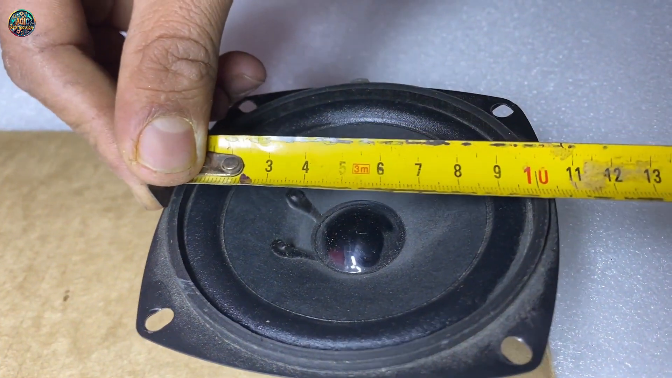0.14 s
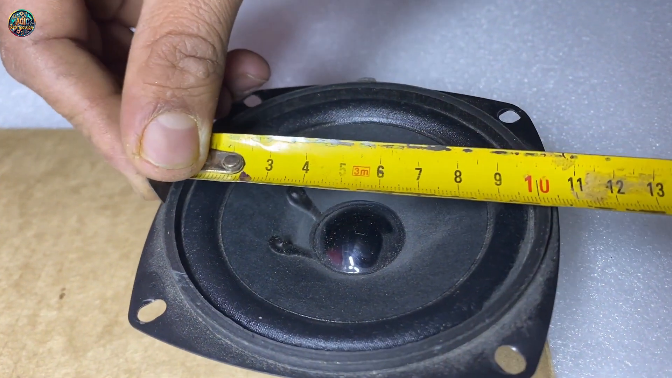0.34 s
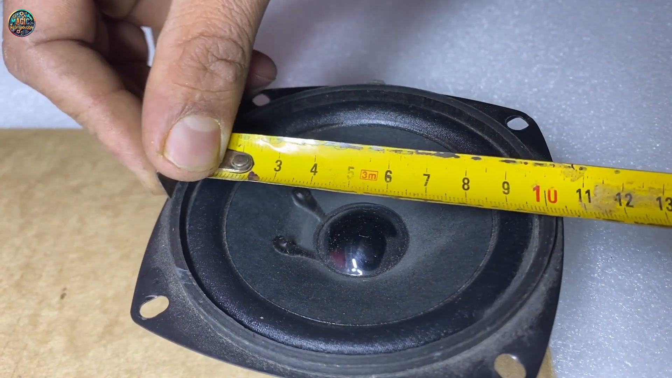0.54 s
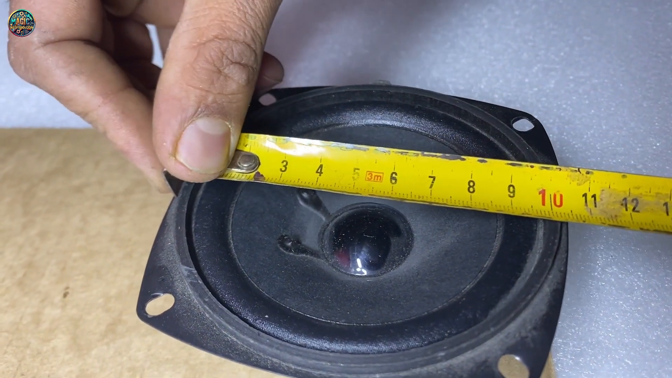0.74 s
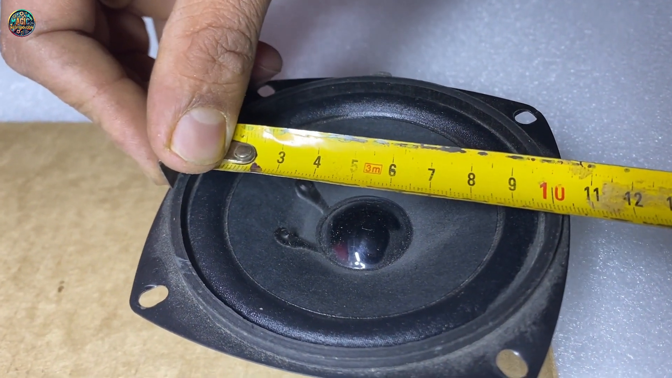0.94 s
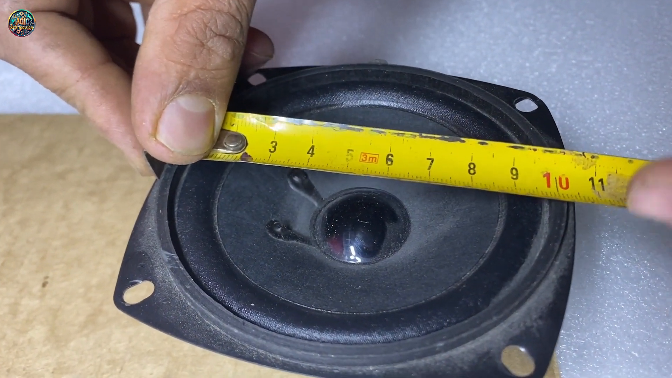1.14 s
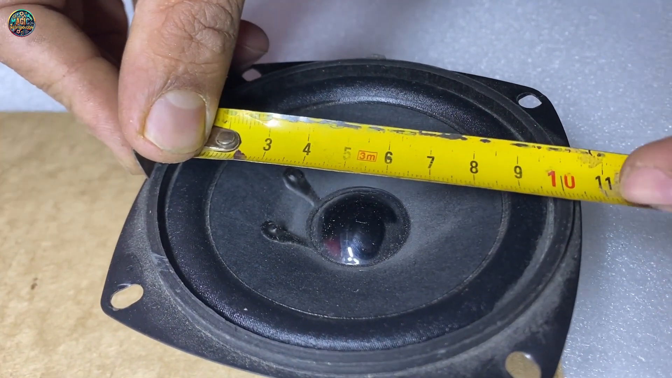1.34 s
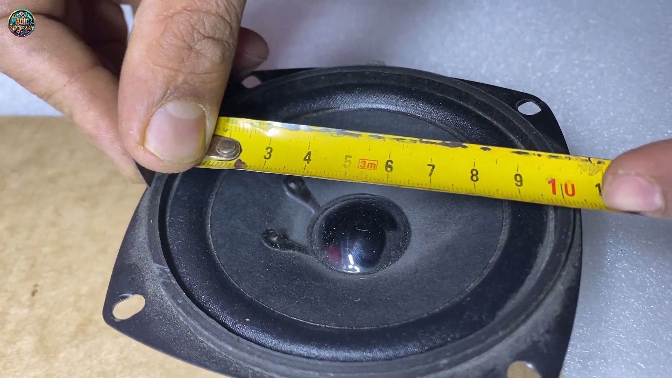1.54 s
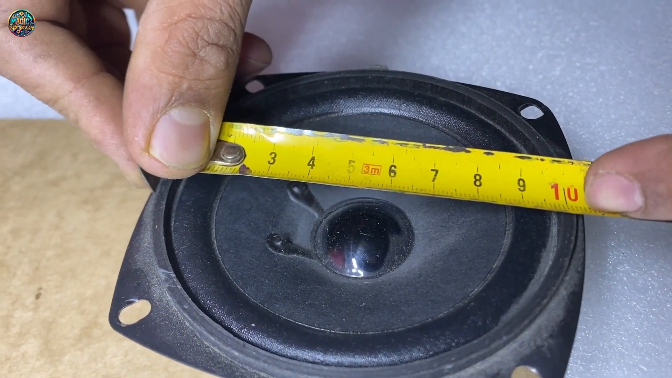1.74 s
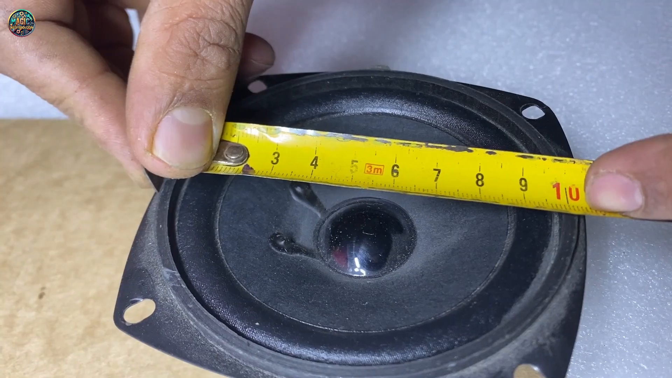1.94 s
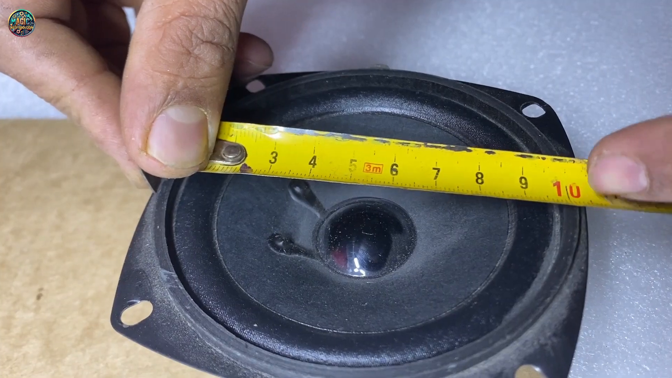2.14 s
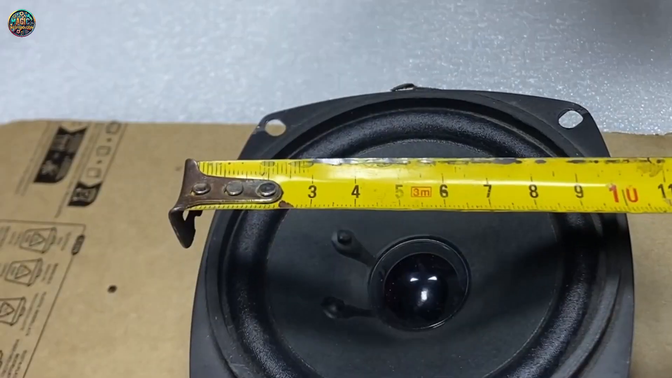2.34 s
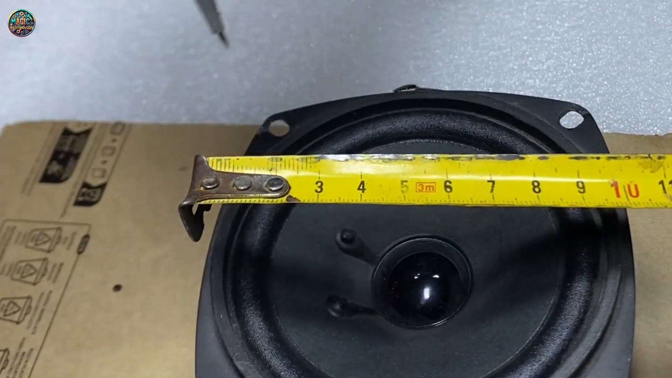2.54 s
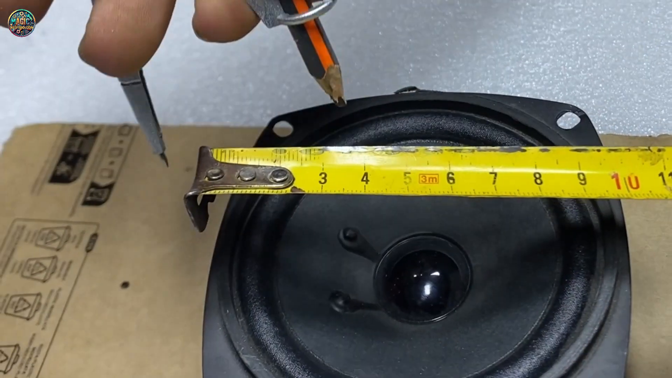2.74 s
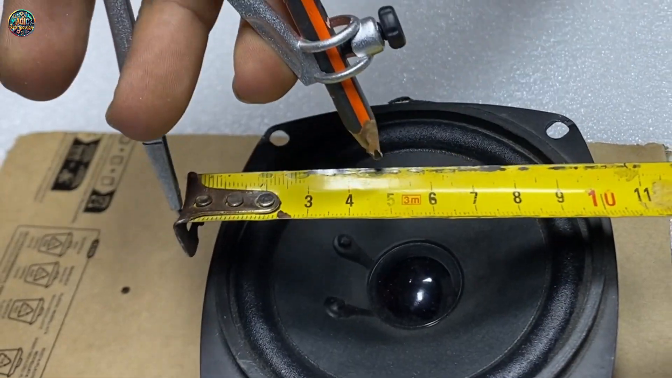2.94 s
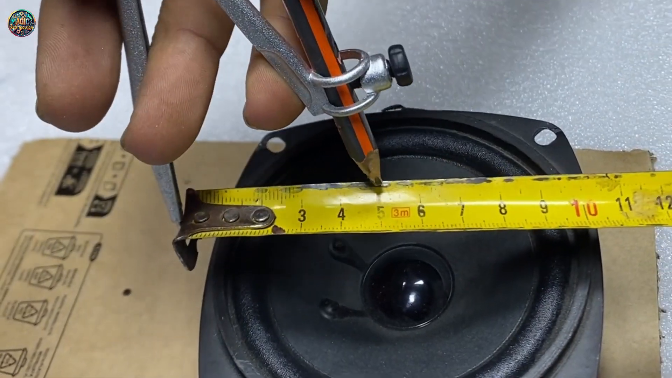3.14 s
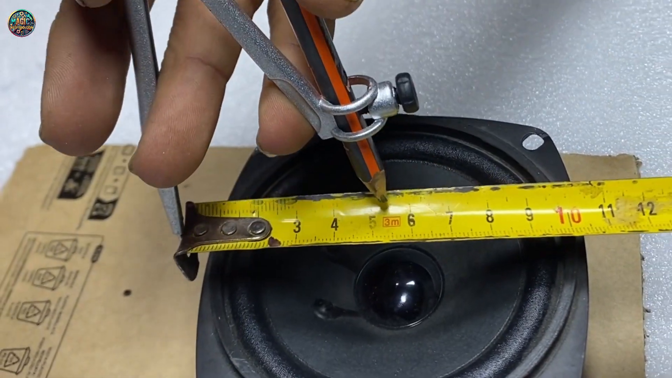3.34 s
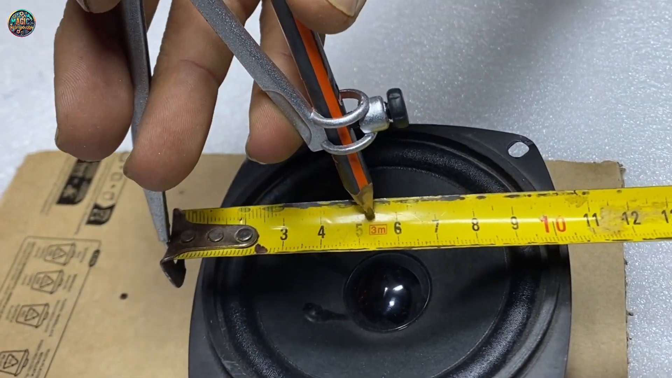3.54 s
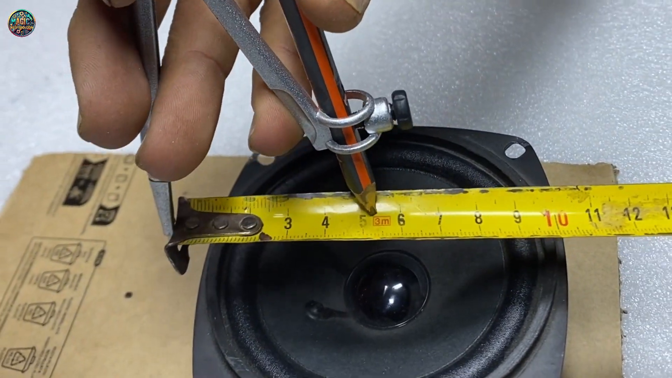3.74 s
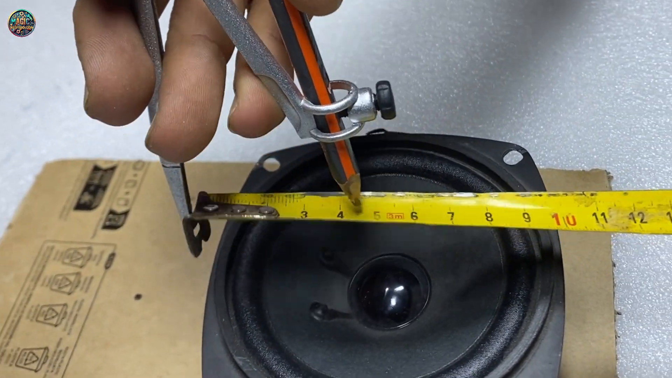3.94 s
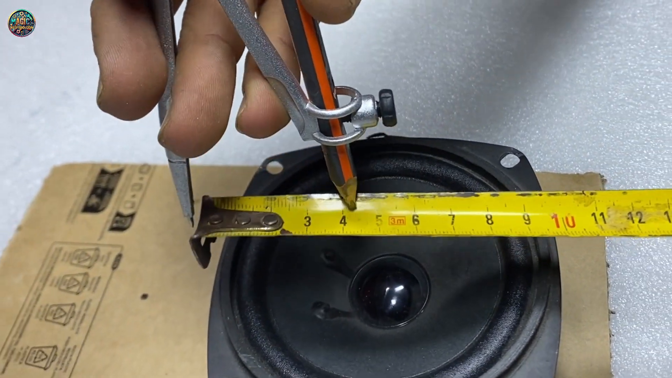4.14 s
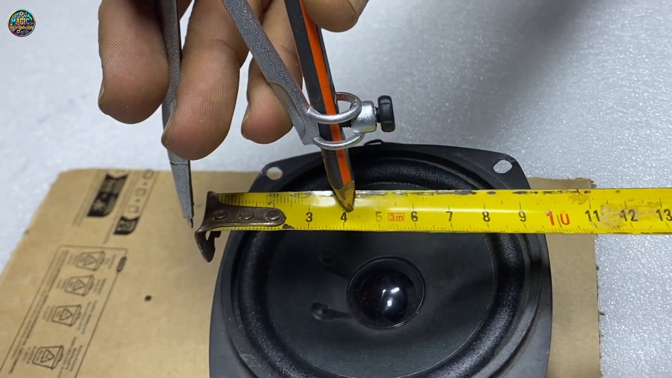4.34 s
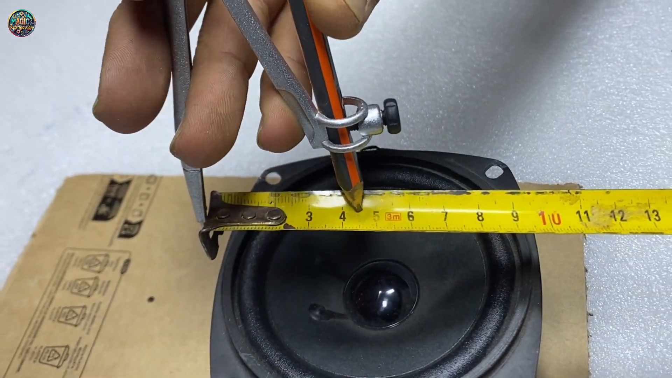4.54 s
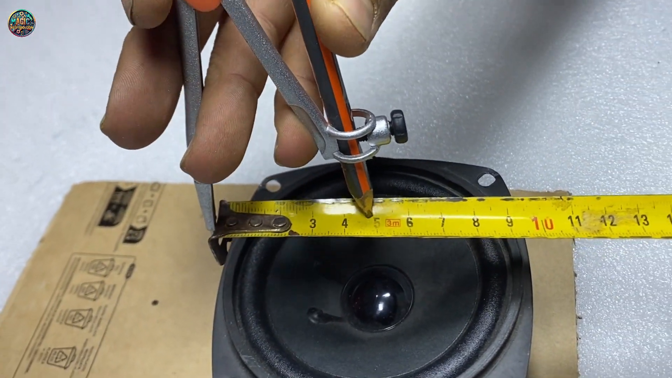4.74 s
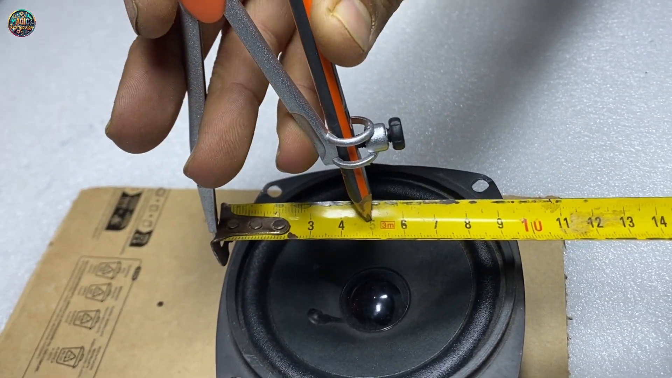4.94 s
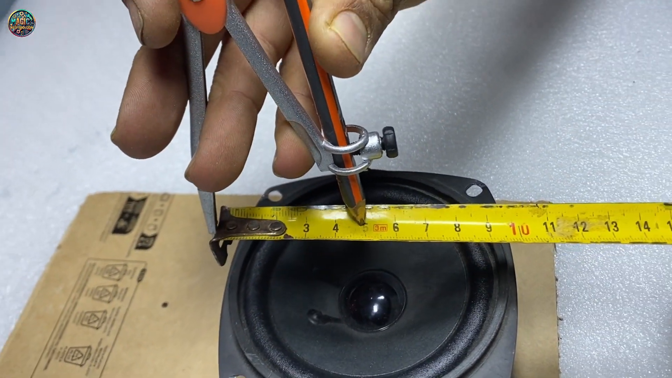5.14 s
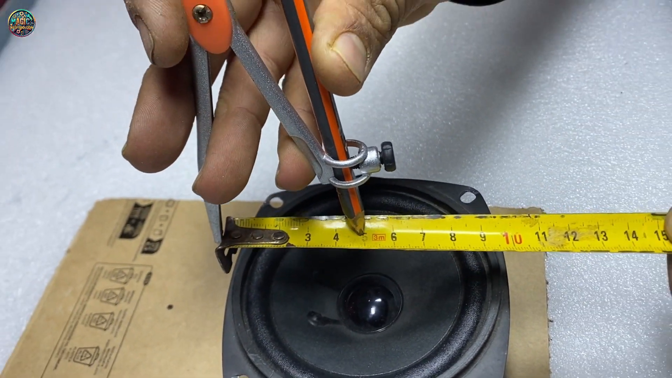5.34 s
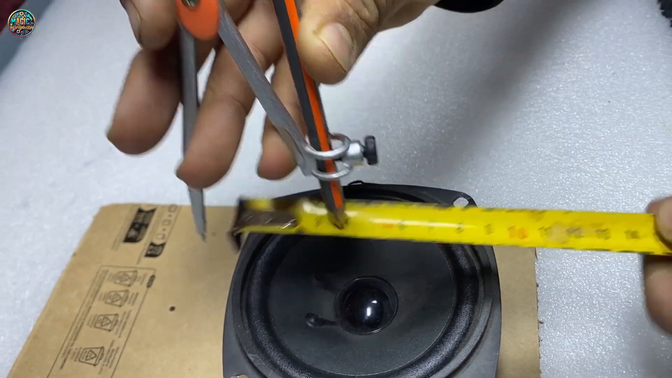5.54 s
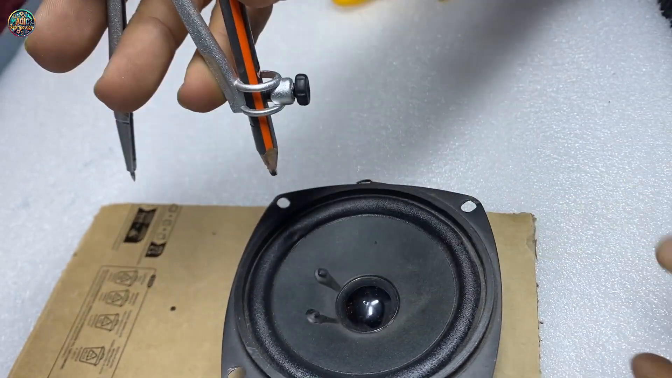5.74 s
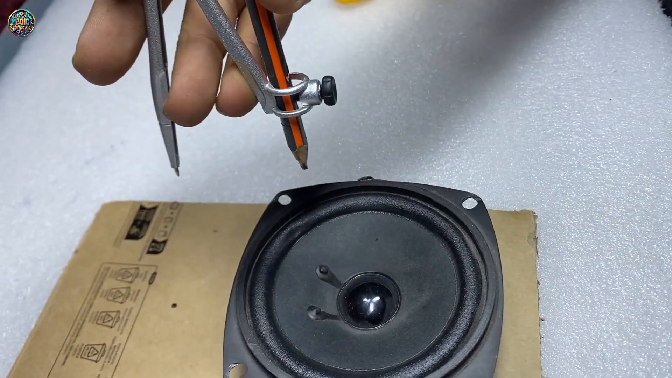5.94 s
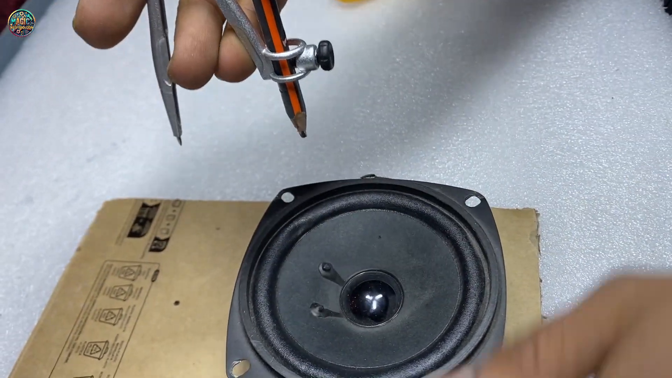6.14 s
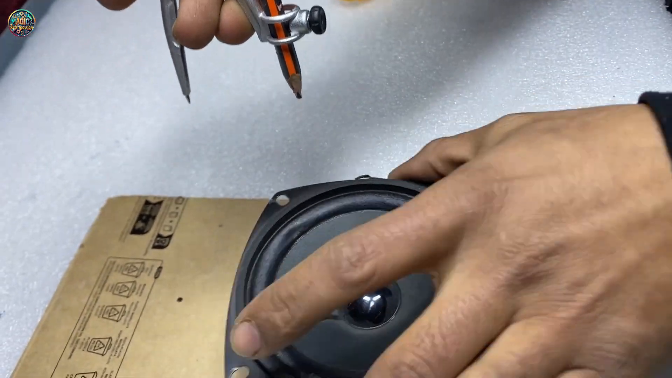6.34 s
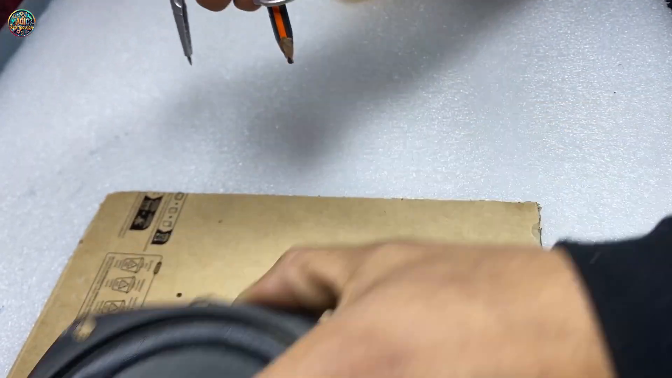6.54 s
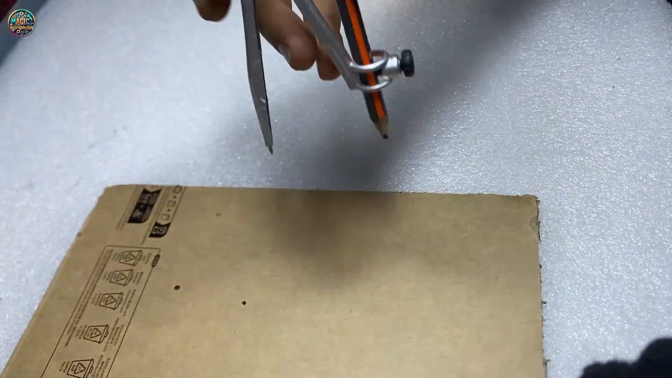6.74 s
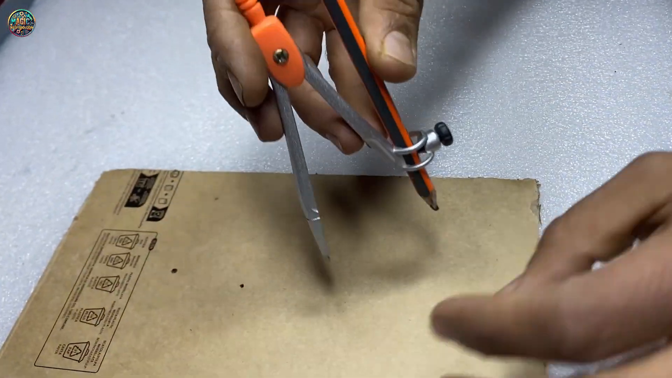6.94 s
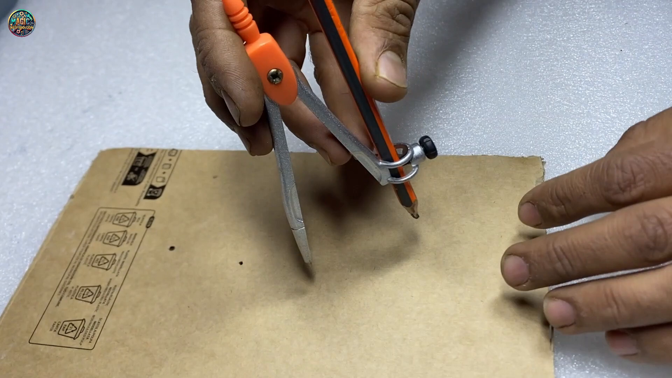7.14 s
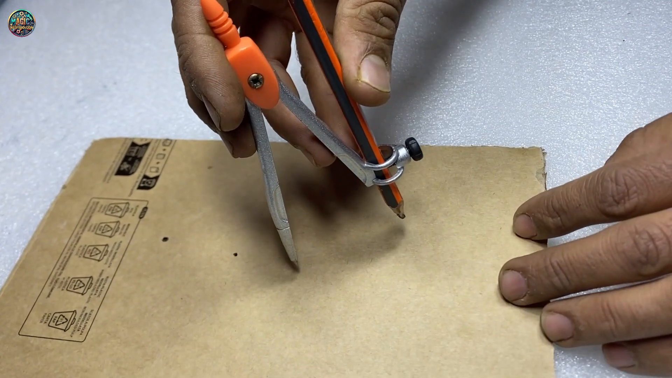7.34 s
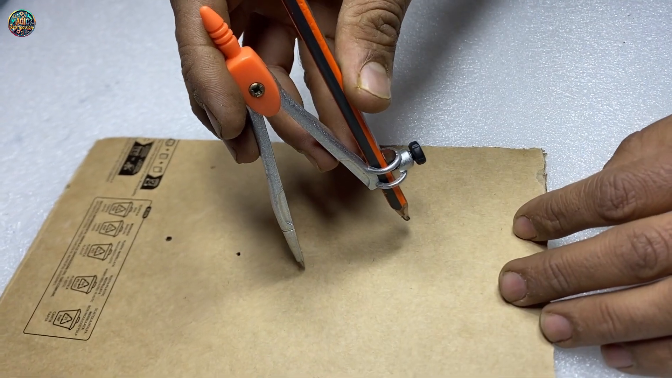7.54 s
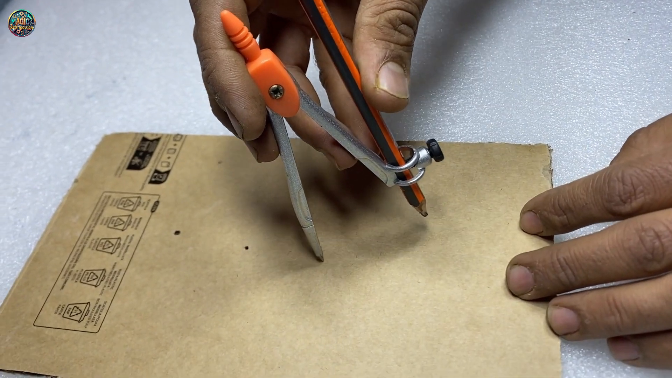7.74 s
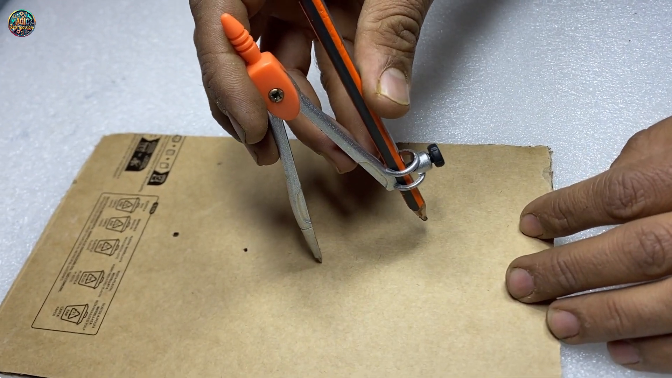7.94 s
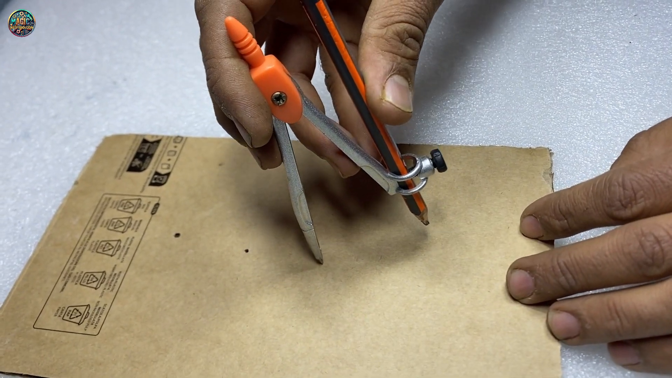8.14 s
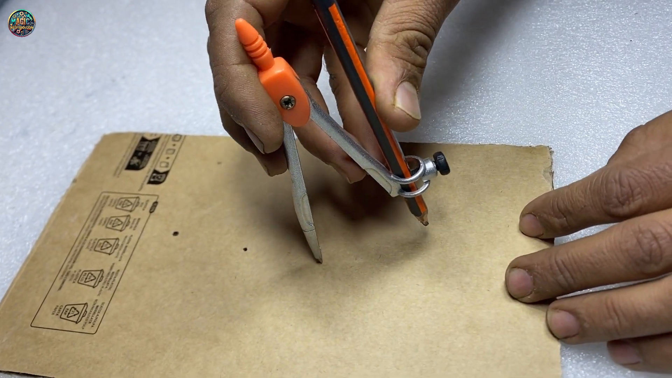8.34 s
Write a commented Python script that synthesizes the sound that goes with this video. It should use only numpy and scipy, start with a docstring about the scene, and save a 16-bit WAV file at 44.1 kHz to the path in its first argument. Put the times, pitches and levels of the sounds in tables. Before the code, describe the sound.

Close, centred, nearly mono handling on a padded bench, with little room echo. Irregular bright ticks and short gritty strokes of metal on a speaker come first, then a quiet stretch of tiny clicks and blurred far thuds. A quick tape retraction clatters, a cluster of boomy cardboard knocks and a brief rub follow, then a softer set-down and near silence over low rumble and faint hiss.

```python
"""Tape measure and loudspeaker on a bench

A steel tape ticks, rubs and creaks on a small loudspeaker's frame; each touch is a pulse into ringing bodies.
A pencil compass clicks against the tape, the tape whips back into its case as a hiss with hard clacks,
and the loudspeaker is grabbed and set aside with knocks on cardboard over a padded bench.
Light scratches of point and pencil follow as shaped friction; quiet room noise and far thuds lie behind."""
import sys
import numpy as np
from scipy import signal
from scipy.fft import rfft, irfft
from scipy.io import wavfile
from scipy.ndimage import uniform_filter1d

SR = 44100
rng = np.random.default_rng(int(sys.argv[2]) if len(sys.argv) > 2 else 0)


def log_audio(samples):
    """Write samples as a 16-bit WAV file to the path given in sys.argv[1]."""
    # one column per channel
    frames = np.atleast_2d(samples).T
    # limit to full scale, then quantise
    limited = np.clip(frames, -1, 1)
    pcm = np.round(limited * 32767).astype(np.int16)
    wavfile.write(sys.argv[1], SR, pcm)


N = 374409
TIME = np.arange(N) / SR
CUTOFF_HZ = 16000   # upper edge of the whole sound

# thumb pressure of the blade on the frame: time [s], share [0-1]; none after the last row
GRIP = [(0, 1), (.7, 0.94), (1.55, 0.7), (1.85, .16), (2.4, 0.43)]
# resonances of speaker frame and cone: pitch [Hz], width [Hz], nominal level [dB]
FRAME_MODES = [(378, 46, -8), (527, 72, 7), (790, 140, 8), (1010, 240, 4), (1200, 42, -20)]
# resonances of the padded bench: pitch [Hz], width [Hz], nominal level [dB]
BENCH_MODES = [(46, 23, 11), (78, 29, -1.5), (109.26, 10, 6.5), (189, 170, -8)]
# spectrum of steel blade on frame: frequency [Hz], relative level [dB per Hz]
TAPE_CRACK = [(600, -46), (1900, -14), (3000, 10), (5000, 2.5), (7400, 3.5), (9000, 0), (11200, 4.5),
              (16000, 1)]


def tape_ticks():
    """The steel blade touches the speaker frame, in clear ticks and fainter chance ones."""
    # clearest ticks: start [s], body level [dB], contact t60 [s]
    clear_ticks = [(.019, -45, 0.014), (.0346, -63, 0.0067), (.0471, -58, .006), (.111, -71.5, 0.037),
                   (.2639, -48, 0.011), (.3996, -52, 0.0021), (.4293, -34, 0.0095), (.479, -60, .007),
                   (.4934, -49.5, 0.0095), (.542, -39.5, 0.0093), (.6506, -45, 0.0033),
                   (.6646, -42, 0.0096), (.6927, -46, 0.01), (.7348, -61, 0.005), (.884, -55.5, 0.004),
                   (.9577, -61, 0.028), (1.0297, -49.5, 0.0091), (1.0811, -51, 0.013),
                   (1.1981, -58.5, 0.0054), (1.2044, -51.5, 0.014), (1.4734, -44.5, 0.0067),
                   (1.4889, -53, 0.0026), (1.5079, -54.5, .007), (1.7948, -70.5, 0.0036),
                   (2.1363, -45, 0.044), (2.2768, -71, 0.0072)]
    touches = clear_ticks + stray_ticks()
    return ticks(touches, TAPE_CRACK, crack_rel_db=-8.0, body_chatter=1.0, crack_chatter=1.6, top_hz=11300)


def stray_ticks(count=48):
    """Chance touches, more frequent under a firm thumb: rows of start_s, body level_db, contact_t60_s."""
    rate_per_s = 12   # at full grip
    level_db, spread_db, contact_t60_s = -69.5, 5, 0.015
    held_s, pressure = GRIP[-1][0], grip()
    place, chance, strength = rng.random((count, 3)).T
    times = (np.arange(count) + place) * held_s / count   # one possible touch in each time slot
    touches = chance < np.interp(times, TIME, pressure) * rate_per_s * held_s / count
    levels = level_db + spread_db * (2 * strength - 1)
    return [(s, db, contact_t60_s) for s, db in zip(times[touches], levels[touches])]


def compass_ticks():
    """Small clicks of the compass, brief metal contacts of one fixed length."""
    # clicks: start [s], body level [dB]
    clicks = [(2.6337, -85), (2.9926, -66.5), (3.058, -60.5), (3.6427, -60.5), (3.969, -75.5),
              (4.45, -69.5), (7.023, -81), (8.4287, -78)]
    # spectrum of the compass's crack: frequency [Hz], relative level [dB per Hz]
    compass_crack = [(800, -14), (2000, 1.5), (3200, -3.5), (5000, -3), (6800, -4), (8200, 2),
                     (10000, -10.5), (16000, -17)]
    contact_t60_s = 0.026
    touches = [(s, db, contact_t60_s) for s, db in clicks]
    return ticks(touches, compass_crack, crack_rel_db=-6.0, body_chatter=1.3, crack_chatter=2.0, top_hz=13900)


def ticks(touches, crack_colour, crack_rel_db, body_chatter, crack_chatter, top_hz):
    """Light metal contacts: a bright crack and a brief answer from the frame and cone."""
    # the crack grows more slowly than the body's answer, so light touches sound brighter
    ref_db, crack_db_per_db = -45, 0.7128
    scuff_db_per_s = 267   # a longer contact scuffs and adds to the crack
    soft_s, softens = 0.024, 0.43   # contact t60 at which the crack's edge is top_hz; exponent of its fall
    out = np.zeros(N)
    for s, body_db, t60 in touches:
        crack_db = ref_db + crack_rel_db + crack_db_per_db * (body_db - ref_db) + scuff_db_per_s * t60
        body = hollow(contact(2 * t60, body_chatter), FRAME_MODES)
        crack = colour(contact(t60, crack_chatter), crack_colour)
        crack = low_pass(crack, top_hz * (soft_s / t60) ** softens, order=3)
        add(out, s, blow(body_db, body) + blow(crack_db, crack))
    return out


def finger_creak(level_db=-73.0, crack_db=-5.0, unsteady_db=4.0, unsteady_hz=25):
    """While the thumb holds the blade down, it creeps on the frame in spurts of tiny slips."""
    spurts = wander(N, unsteady_db, unsteady_hz)
    slips = friction(N, per_s=41, grain=0.8) * spurts
    body = rms_one(hollow(slips, FRAME_MODES))
    crack = rms_one(colour(slips, TAPE_CRACK))
    return from_db(level_db) * grip() * (body + from_db(crack_db) * crack)


def grip():
    """The thumb's pressure at every moment."""
    return np.clip(np.interp(TIME, *np.transpose(GRIP), right=0), 0, None)


def blade_rubs():
    """Bright, gritty friction strokes of the blade on the frame."""
    # strokes: peak time [s], swell and fade time each [s], body level [dB], hiss centre [Hz]
    rub_rows = [(.045, 0.036, -54, 3650), (0.424, 0.053, -55, 3140), (0.544, 0.029, -51.5, 3250),
                (1.021, 0.028, -52.5, 3480), (1.064, .017, -45.5, 3780), (1.118, 0.032, -55.5, 3400),
                (1.3, 0.026, -56, 2320), (1.51, 0.039, -57.5, 7000), (1.584, .03, -57.5, 2720),
                (1.692, 0.049, -66.5, 2730), (2.13, 0.066, -52, 4620), (2.155, .014, -52, 2700),
                (2.419, .14, -75, 2420), (3.646, 0.036, -61, 7850)]
    hiss_rel_db, drag_rel_db, body_hz = -4, -3.5, 730
    out = np.zeros(N)
    for peak, swell, db, hiss_hz in rub_rows:
        rub = stroke(swell, swell, db + drag_rel_db, db, db + hiss_rel_db, body_hz, hiss_hz,
                     grain=0.59, sing_db=2)
        add(out, peak - swell, rub)
    return out


def tape_rewind(ring_db=-6.0, rattle_db=-14.5, rattle_t60=0.039):
    """The blade hisses in and slaps the slot; its hook slams into the hollow case, which jolts and rattles."""
    # hiss of the blade running in: time [s], level [dB]
    rewind_level = [(5.545, -81.5), (5.56, -50), (5.59, -48.5), (5.625, -42.5), (5.66, -36.5),
                    (5.70, -37.5), (5.712, -42.5), (5.74, -83.5)]
    # blade and hook hits: start [s], recoil level [dB], body level [dB], crack level [dB], contact t60 [s]
    clack_rows = [(5.632, -58, -37, -32.5, 0.052), (5.652, -36, -26, -30, 0.11),
                  (5.688, -40.5, -38.5, -34, .012), (5.7022, -35.5, -22, -18.5, 0.021)]
    # hollow body, then bright ring of the case: pitch [Hz], width [Hz], nominal level [dB]
    case_modes = [(484, 55, 9), (640, 90, 0), (900, 140, 0.5), (1200, 180, -1.5), (1500, 170, -13),
                  (1890, 34, 0)]
    case_ring = [(2290, 68, -2), (2634, 72, -2.5), (3097, 120, 0), (3520, 150, 6.5), (3860, 150, -7),
                 (5870, 120, 0), (7313, 160, -10.5), (8640, 250, -16), (14600, 300, -14.5)]
    # spectra of case crack and running blade: frequency [Hz], relative level [dB per Hz]
    case_crack = [(700, -11.5), (2000, -12), (3200, 3), (4500, -8), (6000, -7.5), (8500, -11),
                  (11500, -15.5), (14200, -14.5), (16000, -20.5)]
    rewind_hiss = [(150, -15), (500, 2.5), (1200, 0), (1800, -6.5), (3000, 0.5), (5000, -7), (8000, -4.5),
                   (12000, -8), (16000, -17)]
    rush = rms_one(colour(friction(N, per_s=980, grain=0.28), rewind_hiss))
    out = rush * from_db(np.interp(TIME, *np.transpose(rewind_level), left=-200, right=-200))
    for s, recoil_db, body_db, crack_db, t60 in clack_rows:
        onset = 1 - np.exp(-TIME[:8192] / .0008)
        force = contact(t60, chatter=6.0) * onset
        rattle = low_pass(colour(contact(rattle_t60, chatter=20), case_crack), 5000, order=1)
        crack = unit_blow(colour(force, case_crack))
        crack += blow(ring_db, resonate(force, case_ring)) + blow(rattle_db, rattle)
        body = favour(resonate(contact(t60, chatter=.9), case_modes), 520, width=.4, peak_db=3.0)
        recoil = low_pass(resonate(contact(t60, chatter=0.35), BENCH_MODES), 260, order=2)
        add(out, s, blow(recoil_db, recoil) + blow(body_db, body) + from_db(crack_db) * unit_blow(crack))
    return out


def knocks(soft_hz=215):
    """The padded bench thumps and sways, the cardboard gives a hollow clop, and its surface cracks."""
    # start [s], thump level [dB], clop level [dB], crack level [dB], clop centre [Hz]
    knock_rows = [(0.265, -35.5, -41, -44.5, 620), (.634, -39.5, -41, -64, 394),
                  (2.1488, -50, -36.5, -55, 510), (3.6516, -72, -56, -60.5, 1080),
                  (6.071, -20, -39, -38.5, 389.5), (6.0781, -45, -19, -26.5, 628),
                  (6.1065, -13.5, -20, -30.5, 550), (6.1218, -37, -20, -41.5, 1090),
                  (6.14, -28, -31.5, -39, 450), (6.166, -24, -27.5, -37, 390), (6.22, -41, -50, -57.5, 458),
                  (6.7343, -34, -39.5, -53, 800), (6.750, -23, -45.5, -61.5, 466),
                  (6.7675, -37, -57, -67, 689), (6.7948, -37, -59, -58, 1000),
                  (7.2454, -54.5, -54.5, -73, 900), (7.2552, -51, -51.5, -69, 694),
                  (7.8493, -49, -49.5, -69, 810)]
    # cardboard resonances: pitch [Hz], width [Hz], nominal level [dB]
    board_modes = [(332.5, 52, 5), (433.4, 145, 3), (545, 210, 0), (703.4, 330, -6), (890, 420, -3.5),
                   (1210, 210, -3), (1555, 32, 0.5)]
    # cardboard surface spectrum: frequency [Hz], relative level [dB per Hz]
    board_crack = [(700, -6), (1700, 1), (2200, -7), (2800, -0.5), (4000, -12), (7000, -15.5), (11000, -21),
                   (16000, -22.5)]
    # contact t60 at the reference pitch; a higher clop comes from a shorter contact
    ref_t60_s, ref_hz, shortens = .022, 500, 0.98
    pad_hz, pad_width_hz, pad_rel_db = 40, 12, -11   # soft pad sways after each thump
    out = np.zeros(N)
    sway = unit_blow(resonate(signal.unit_impulse(SR // 2), [(pad_hz, pad_width_hz, 0)]))
    sway = low_pass(sway, 2 * pad_hz, order=2)
    for s, thump_db, clop_db, crack_db, centre_hz in knock_rows:
        t60 = ref_t60_s * (ref_hz / centre_hz) ** shortens
        thump = low_pass(resonate(contact(t60, chatter=0.037), BENCH_MODES), soft_hz, order=2)
        clop = hollow(contact(t60, chatter=1.6), board_modes)
        clop = favour(clop, centre_hz, width=0.46, peak_db=11.0)
        crack = colour(contact(1.9 * t60, chatter=5.1), board_crack)
        add(out, s, blow(thump_db, thump) + blow(clop_db, clop) + blow(crack_db, crack))
        add(out, s, from_db(thump_db + pad_rel_db) * sway)
    return out


def slides():
    """Things slide over the cardboard; most strokes are dull, a few are mainly hiss."""
    # peak time [s], swell [s], fade [s], body level [dB], hiss level [dB], drag level [dB]
    slide_rows = [(.645, 0.032, 0.036, -43.5, -60, -43.5), (4.68, 0.031, .06, -75, -86, -76),
                  (5.93, .16, .035, -80, -68.5, -91), (6.083, 0.041, 0.095, -36, -40.5, -36),
                  (6.366, 0.05, 0.031, -33, -45.5, -43.5), (6.745, 0.031, 0.16, -53.5, -61, -66),
                  (7.026, .012, 0.036, -74.5, -64, -83), (7.755, .025, 0.034, -57, -77, -63.5),
                  (8.369, 0.046, .044, -70, -75.5, -75.5)]
    body_hz, hiss_hz = 957.7, 2860
    out = np.zeros(N)
    for peak, swell, fade, db, hiss_db, drag_db in slide_rows:
        slide = stroke(swell, fade, drag_db, db, hiss_db, body_hz, hiss_hz, grain=0.42, sing_db=1)
        add(out, peak - swell, slide)
    return out


def stroke(swell, fade, drag_db, body_db, hiss_db, body_hz, hiss_hz, grain, sing_db, touch_share=.4,
           edge_db=21, drag_hz=210, drag_width_hz=190, judder_db=3.0, judder_hz=130):
    """Swelling, juddering friction drags at the bench, drives the body's resonances and hisses."""
    # rubbed body's resonances: pitch [Hz], width [Hz], nominal level [dB]
    rub_modes = [(364.3, 18, -1), (523, 200, 0.5), (708, 50, -1.5), (878, 90, -4.5), (1326, 21, -2)]
    # friction spectrum: frequency [Hz], relative level [dB per Hz]
    rub_hiss = [(300, -10), (1200, -7.5), (2100, -4), (3000, -7), (4500, -8.5), (6500, -15.5), (10000, -17),
                (16000, -24.5)]
    t = TIME[:SR // 3]
    force = friction(len(t), per_s=380, grain=grain) * wander(len(t), judder_db, judder_hz)
    away = np.maximum((swell - t) / swell, (t - swell) / fade)   # 0 at the peak, 1 at either end
    pressure = from_db(-edge_db * away ** 1.3) * np.minimum(t / (touch_share * swell), 1)
    drag = resonate(force, [(drag_hz, drag_width_hz, 0)])
    drag = rms_one(low_pass(drag, 2 * drag_hz, order=2))
    body = rms_one(favour(hollow(force, rub_modes), body_hz, width=1.0, peak_db=3.0))
    hiss = rms_one(favour(colour(force, rub_hiss), hiss_hz, width=.17, peak_db=sing_db))
    return pressure * (from_db(drag_db) * drag + from_db(body_db) * body + from_db(hiss_db) * hiss)


def squeaks(waver=0.018):
    """Stick and slip lock into brief, unsteady tones that glide a little."""
    # things shifting: start [s], end [s], start pitch [Hz], end pitch [Hz], level [dB]
    squeak_rows = [(1.055, 1.068, 4310, 3380, -48.5), (1.066, 1.078, 740, 720, -45),
                   (2.095, 2.123, 715, 730, -53.5), (4.321, 4.59, 1880, 2110, -88),
                   (5.925, 5.958, 3050, 2750, -68), (6.364, 6.388, 913, 965, -34.5),
                   (6.948, 7.154, 560, 552, -82), (7.602, 7.863, 1234, 1211, -78.5)]
    out = np.zeros(N)
    for start, end, start_hz, end_hz, db in squeak_rows:
        size = max(round((end - start) * SR), 256)
        unsteady = rms_one(low_pass(rng.standard_normal(size), 120, order=2))
        hz = np.linspace(start_hz, end_hz, size) * (1 + waver * unsteady)
        tone = np.sin(2 * np.pi * np.cumsum(hz) / SR) * np.sqrt(np.hanning(size))
        add(out, start, from_db(db) * rms_one(tone))
    return out


def far_thuds(rise_s=0.014):
    """Distant blows arrive blurred and dull; the lows roll on longest."""
    # start [s], level over the first 0.1 s [dB], top edge [Hz]
    thud_rows = [(3.158, -47, 616), (3.196, -44.5, 330), (4.441, -56, 52.6), (4.688, -65.5, 300),
                 (4.767, -49, 59.2)]
    # decay: frequency [Hz], t60 [s]
    thud_t60 = [(50, 0.78), (150, 0.85), (300, 0.083), (600, 0.21)]
    # spectrum: frequency [Hz], relative level [dB]
    thud_colour = [(30, -9.5), (70, 1), (125, -1), (210, -0.5), (330, -7.5), (500, 1), (700, -12.5)]
    out = np.zeros(N)
    for s, db, top_hz in thud_rows:
        roll = colour(dying_noise(thud_t60, size=2 * SR), thud_colour)
        roll = low_pass(roll * (1 - np.exp(-TIME[:len(roll)] / rise_s)), top_hz, order=6)
        add(out, s, from_db(db) * roll / np.std(roll[:SR // 10]))
    return out


def room(x, wet_db, build_s=0.0069):
    """A weak, short tail from the walls, made of fading noise."""
    # decay: frequency [Hz], t60 [s]
    room_t60 = [(100, 0.39), (500, 0.17), (3000, 0.091), (14000, 0.27)]
    # spectrum of the tail: frequency [Hz], relative level [dB]
    room_colour = [(50, 2), (120, 5), (300, -1.5), (500, 3), (1000, -3.5), (3000, 2), (8000, -13),
                   (16000, -20)]
    tail = colour(dying_noise(room_t60, size=SR), room_colour) * (1 - np.exp(-TIME[:SR] / build_s))
    return from_db(wet_db) * signal.fftconvolve(x, tail / np.linalg.norm(tail))[:N]


def background(surge_db=3.5, whine_gain_db=3.0, width_db=-26.5):
    """Surging low rumble, faint hiss and a thin whine, almost the same on both sides."""
    # spectra of rumble and hiss: frequency [Hz], relative level [dB per Hz]
    rumble_colour = [(10, 2), (30, -0.5), (50, -4.5), (70, -12), (115, -16.5), (160, -23.5), (300, -38),
                     (800, -56.5)]
    air_colour = [(120, -15), (220, -2), (350, -6.5), (550, -9), (900, -12), (1500, -13.5), (4000, -17.5),
                  (8000, -20.5), (12000, -27.5), (14500, -25.5), (16000, -25)]
    # steady whine of the electronics, then its highest partials: pitch [Hz], level before whine_gain_db [dB]
    whine_partials = [(4048, -101), (4527, -100), (5071, -101), (5545, -100), (6029, -103), (6573, -102),
                      (7047, -102), (7585, -104), (8070, -104), (8586, -106), (9087, -106), (9572, -107)]
    whine_top = [(13620, -108), (14637, -107), (15122, -104), (15660, -105)]
    # rumble of the room, and of the hand leaning on the bench at full grip, before surging
    room_db, hand_db = -60, -54
    air_db = -76.5
    surge = wander(N, surge_db, 9.4)
    level = np.hypot(from_db(room_db), from_db(hand_db) * grip())
    rumble = rms_one(colour(rng.standard_normal(N), rumble_colour)) * level * surge
    whine = np.zeros(N)
    for hz, db in whine_partials + whine_top:
        partial = np.sqrt(2) * np.sin(2 * np.pi * (hz * TIME + rng.random()))
        whine += from_db(db + whine_gain_db) * partial
    whites = rng.standard_normal((2, N))
    mid, side = (from_db(air_db) * rms_one(colour(white, air_colour)) for white in whites)
    return rumble + whine + mid + from_db(width_db) * side * np.array([[1], [-1]])


def contact(t60, chatter, size=8192):
    """Force of a touch: one sharp pulse and a dying chatter of micro-impacts."""
    force = rng.standard_normal(size) * from_db(-60 * np.minimum(TIME[:size] / t60, 4))
    force *= chatter / np.linalg.norm(force)
    force[0] += 1
    return force


def friction(size, per_s, grain):
    """Smooth sliding noise with the catches of single fibres and edges in it."""
    catches = (rng.random(size) < per_s / SR) * rng.standard_normal(size)
    return rng.standard_normal(size) + grain * rms_one(catches)


def resonate(x, modes):
    """Parallel resonances; each contact point favours them differently."""
    out = 0
    for hz, width, db in modes:
        r = np.exp(-np.pi * width / SR)
        ring = signal.lfilter([1, 0, -1], [1, -2 * r * np.cos(2 * np.pi * hz / SR), r * r], x)
        out = out + ring * (1 - r * r) * from_db(db + 2 * rng.standard_normal())
    return out


def hollow(force, modes):
    """Cardboard and paper cone radiate well only below a sharp upper edge."""
    return low_pass(resonate(force, modes), 1720, order=10)


def favour(x, hz, width, peak_db):
    """The place of contact adds a peak at one region of the spectrum; width is a share of its centre."""
    b, a = signal.iirpeak(hz, 1 / width, fs=SR)
    return x + from_db(peak_db) * signal.lfilter(b, a, x)


def dying_noise(t60s, size):
    """Octave bands of noise, the highest cut short, each fading at its own rate."""
    out = 0
    for low in 22 * 2. ** np.arange(10):
        band = signal.butter(2, [low, min(2 * low, CUTOFF_HZ)], "band", fs=SR, output="sos")
        fade = from_db(-60 * TIME[:size] / at_hz(t60s, low * np.sqrt(2)))
        out = out + signal.sosfilt(band, rng.standard_normal(size)) * fade
    return out


def wander(size, spread_db, hz):
    """Gain that drifts at random, as slow noise in decibels with the given rms spread."""
    return from_db(spread_db * rms_one(low_pass(rng.standard_normal(size), hz, order=2)))


def colour(x, spectrum, size=8192):
    """Causal (minimum-phase) filter that follows a spectrum."""
    cepstrum = irfft(np.log(from_db(at_hz(spectrum, np.fft.rfftfreq(size, 1 / SR)))))
    cepstrum[1:size // 2] *= 2
    cepstrum[size // 2 + 1:] = 0
    return signal.fftconvolve(x, irfft(np.exp(rfft(cepstrum))))[:len(x)]


def low_pass(x, hz, order):
    """Butterworth low-pass, never above the cutoff of the whole sound."""
    return signal.sosfilt(signal.butter(order, min(hz, CUTOFF_HZ), fs=SR, output="sos"), x)


def at_hz(points, hz):
    """Read a table on a log-frequency axis."""
    freqs, values = np.transpose(points)
    return np.interp(np.log(np.maximum(hz, 1)), np.log(freqs), values)


def from_db(db):
    """Decibels to gain."""
    return 10 ** (np.asarray(db) / 20)


def rms_one(x):
    """Scale to rms 1."""
    return x / np.sqrt(np.mean(x ** 2) + 1e-20)


def unit_blow(x):
    """Scale a blow to the energy of 10 ms at rms 1."""
    return x / np.sqrt(np.sum(x ** 2) / (.01 * SR) + 1e-20)


def blow(db, x):
    """Set a blow's level relative to a unit blow."""
    return from_db(db) * unit_blow(x)


def add(track, s, sound):
    """Mix a sound into the track at a time."""
    start = max(round(s * SR), 0)
    track[start:start + len(sound)] += sound[:N - start]


def scene(width_db=-33):
    """All the handling happens close by, in the centre; mainly its treble has a little width."""
    near = tape_ticks() + finger_creak() + blade_rubs() + tape_rewind()
    near += compass_ticks() + knocks() + slides() + squeaks()
    late_treble = np.roll(np.diff(near, prepend=0), 40)   # 40 samples late
    side = from_db(width_db) * late_treble * np.array([[1], [-1]])
    return near + side + room(near, wet_db=-20.0) + far_thuds() + background()


def record(dry):
    """The loudest knocks are rounded off, the level dips briefly once, and the top is cut."""
    # brief dip: start and end [s]
    dip_s = (2.305, 2.327)
    peak_limit = .58   # full-scale share that rounded peaks approach
    rounded = dry / (1 + (dry / peak_limit) ** 8) ** (1 / 8)
    dip = uniform_filter1d(1. * ((TIME > dip_s[0]) & (TIME < dip_s[1])), size=256)   # softened edges
    top_cut = signal.ellip(12, .1, 90, CUTOFF_HZ, fs=SR, output="sos")
    return signal.sosfilt(top_cut, rounded * (1 - .98 * dip))


dry = scene()
out = record(dry)
log_audio(out)
```